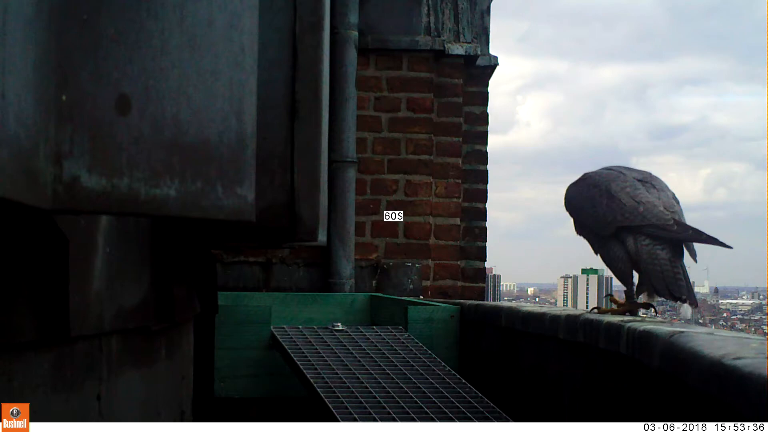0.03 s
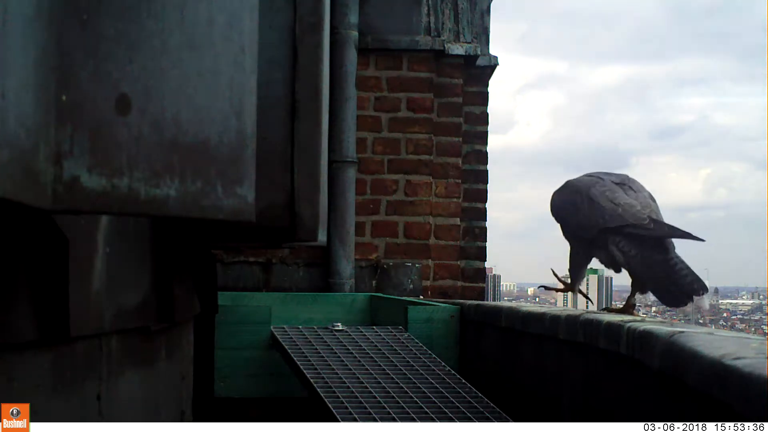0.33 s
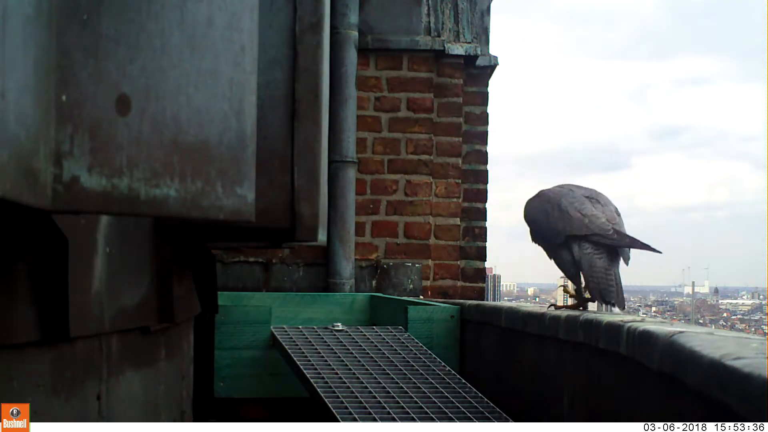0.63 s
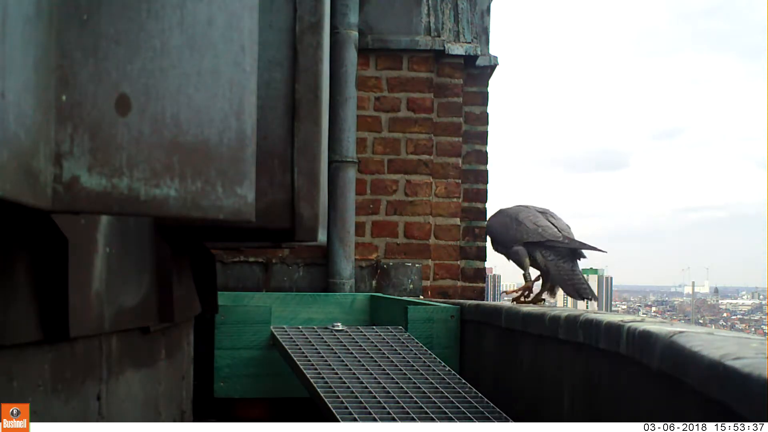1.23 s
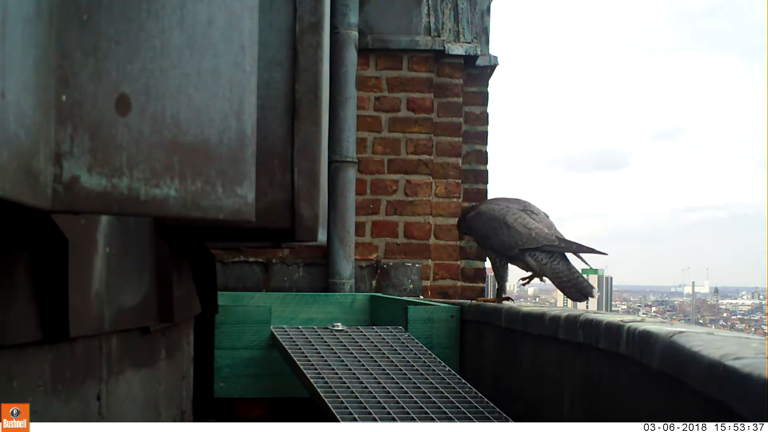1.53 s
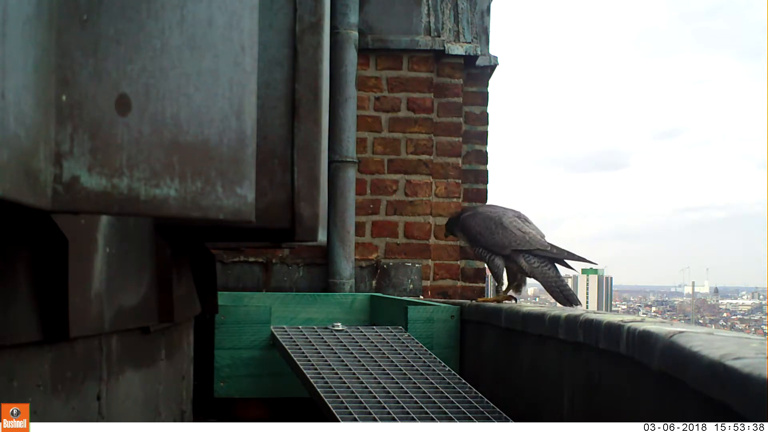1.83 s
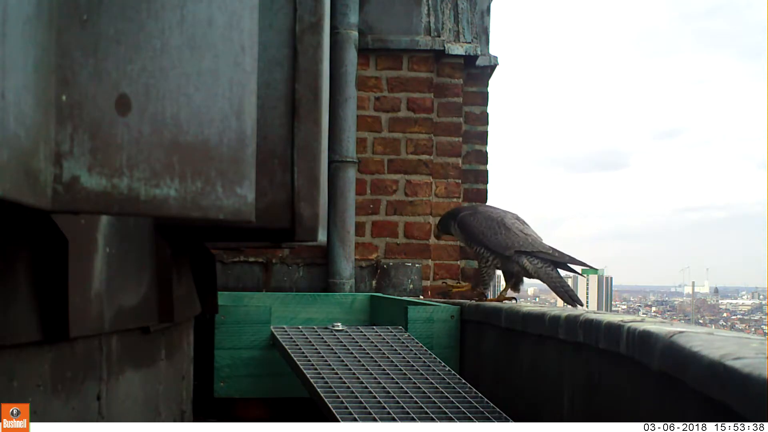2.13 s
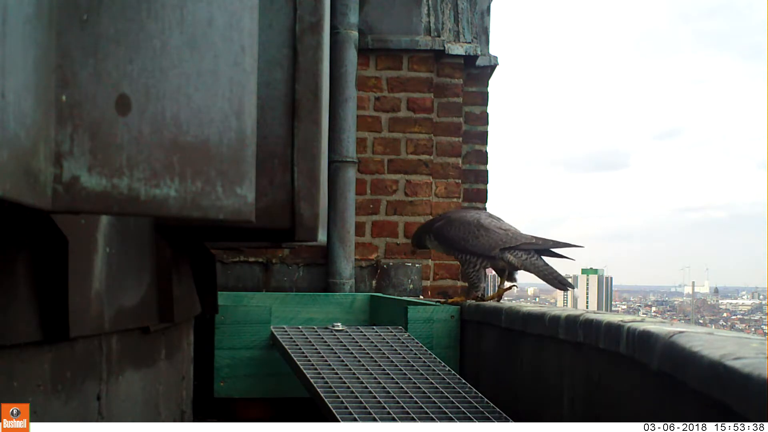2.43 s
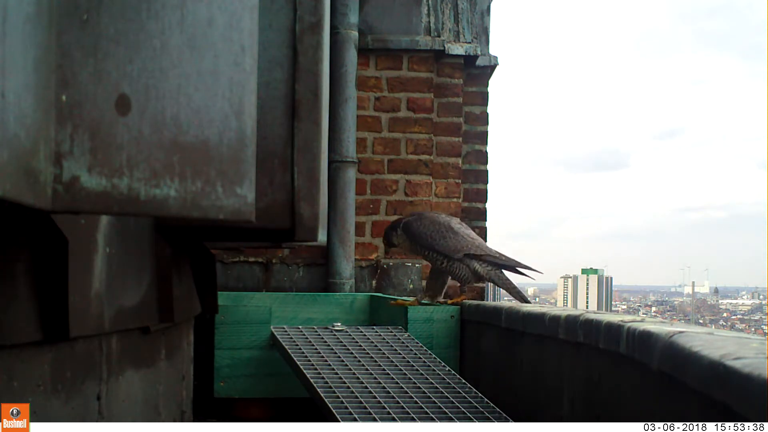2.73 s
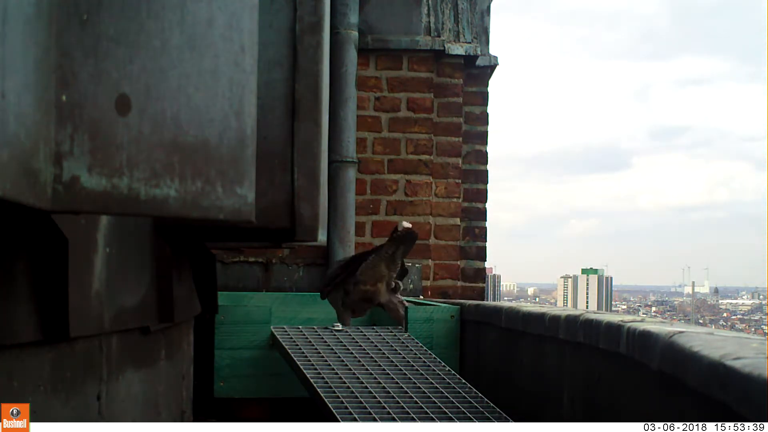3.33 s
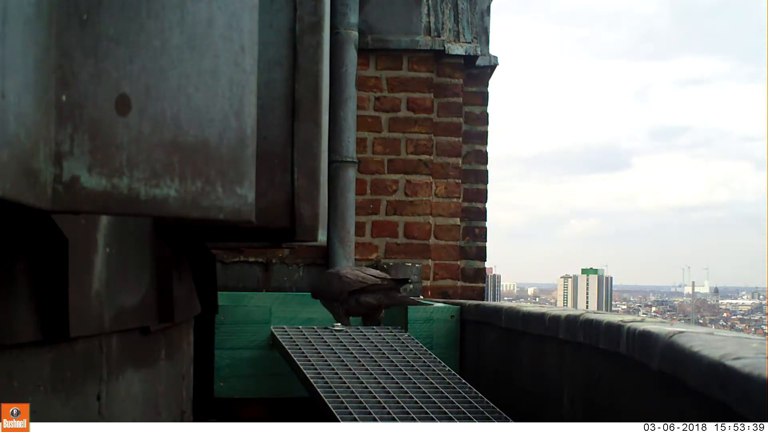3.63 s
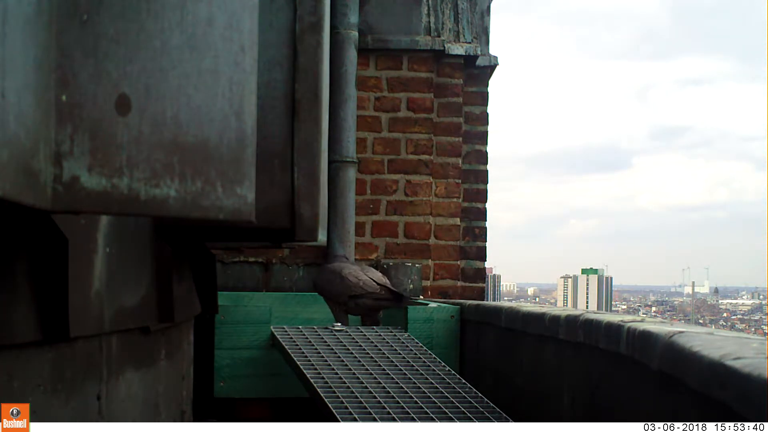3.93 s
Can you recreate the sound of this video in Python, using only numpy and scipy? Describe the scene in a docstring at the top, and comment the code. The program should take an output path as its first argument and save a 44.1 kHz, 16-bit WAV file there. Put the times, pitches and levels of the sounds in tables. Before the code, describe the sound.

A bird's claws tap and scrape along stone, then feathers rustle, over low wind.

```python
"""On a high stone ledge, a falcon walks along and drops into a nest box close by.
Its claws tap and scrape, ringing briefly between the walls, and its heavier steps thud.
Then its feathers brush the box. Two tiny snaps are heard; wind and city rumble lie under it all.
The sound comes on faintly and steps up to full level."""
import sys
import numpy as np
from scipy import signal
from scipy.fft import rfft, irfft
from scipy.io import wavfile
from scipy.ndimage import uniform_filter1d

SR = 44100
rng = np.random.default_rng(int(sys.argv[2]) if len(sys.argv) > 2 else 0)


def transcribe(u):
    """Save the signal u as a 16-bit wav file named by the first command-line argument.

    u: samples, shape (n,) or (channels, n), limited to [-1, 1]; the rate is SR.
    q: integer samples, one column per channel.
    """
    v = np.clip(np.atleast_2d(u).T, -1, 1)
    q = np.round(v * 32767).astype(np.int16)
    wavfile.write(sys.argv[1], SR, q)


N = 176400
T = np.arange(N) / SR

# claw taps: t/s, low knock/dB, middle ring/dB, high tick/dB, claw pitch/Hz
CLAW_TAPS = [(0.208, -47.5, -56, -69, 4300), (.792, -48.5, -56, -73, 3450), (0.826, -60.5, -86, -71, 2020),
             (.841, -74, -59.5, -63, 6750), (.866, -70, -59, -70, 4600), (1.008, -81, -70.5, -81, 4000),
             (1.078, -53, -52, -65, 3980), (1.268, -52.5, -54.5, -73, 4470), (1.276, -54, -62, -84, 2900),
             (1.342, -76, -67.5, -72, 4560), (1.575, -83, -69.5, -82, 4400),
             (1.596, -72, -59.5, -71.5, 4400), (1.689, -75, -62, -71.5, 4440),
             (1.819, -63.5, -56.5, -68.5, 4550), (1.929, -70, -65, -69.5, 4260),
             (1.965, -69, -62, -78, 4400), (2.049, -77, -62.5, -73, 4600), (2.055, -80, -70, -84, 5100),
             (2.119, -69, -64.5, -74.5, 4560), (2.289, -86, -67.5, -80, 4560), (2.297, -86, -76, -87, 5030),
             (2.406, -89, -72.5, -85, 4260), (2.433, -89, -75.5, -86, 4500), (2.511, -83, -74.5, -90, 4400),
             (2.618, -87, -71, -80, 4500), (2.798, -82, -78, -81, 5200), (2.888, -71, -67, -74.5, 4360),
             (2.955, -69.5, -71.5, -81, 4550), (2.981, -72, -64, -77, 4230)]
# claw scrapes: hardest push t/s, swell/s, fade/s, knock/dB, ring/dB, tick/dB, claw pitch/Hz
CLAW_SCRAPES = [(.26, 0.021, 0.07, -64.5, -65, -68, 4450), (.325, .0095, 0.0087, -57.5, -48.5, -60, 4100),
                (.547, 0.013, 0.023, -56, -48, -53, 4720), (.596, 0.01, 0.0092, -57.5, -50, -58.5, 4600),
                (.915, 0.016, 0.0074, -59.5, -49.5, -60.5, 4860),
                (1.113, 0.023, 0.007, -63.5, -50, -56.5, 4720), (1.413, 0.014, 0.035, -78, -67, -70, 4450),
                (1.451, .017, 0.0095, -58.5, -50, -62, 4450), (1.464, .01, 0.005, -56.5, -60, -69.5, 3800),
                (1.618, 0.015, 0.014, -64.5, -63.5, -75, 4530),
                (1.868, 0.025, 0.0076, -70, -66.5, -74.5, 5500), (2.094, .03, 0.025, -80, -68, -79, 4400),
                (2.342, .014, 0.015, -72, -69.5, -91, 4300), (2.671, 0.02, 0.0056, -72, -66.5, -75, 4500),
                (2.879, 0.011, 0.011, -63, -67, -77, 4300)]
def claws(size=16384, slips_per_s=2400, spread_db=3.5):
    """Claws catch and slip on stone. A tap is a click with a short skid; a scrape is a run of slips."""
    out, lead = np.zeros(N), size // 4
    t = (np.arange(size) - lead) / SR
    for when, *touch in CLAW_TAPS:
        force = slips(slips_per_s, spread_db, size) * push(t, swell_s=0.0049, fade_s=0.0087)
        force[lead] += 0.55 * np.linalg.norm(force)  # the click as the claw lands
        add(out, when + t[0], claw_contact(force, *touch))
    for when, swell, fade, *touch in CLAW_SCRAPES:
        force = slips(slips_per_s, spread_db, size) * push(t, swell, fade)
        add(out, when + t[0], claw_contact(force, *touch))
    return out


# tone of claw on stone: f/Hz, level/dB
CLAW_TONE = [(150, 0), (400, -15.5), (800, -8.5), (1300, -9.5), (2100, 2), (2900, -3.5), (4000, 2),
             (4800, 0), (5800, -8), (7500, -16), (10000, -19.5), (13500, -18.5)]
def claw_contact(force, knock_db, ring_db, tick_db, claw_hz):
    """A touch shakes claw and ledge, with its own pitch and its own mix of knock, ring and tick."""
    size = len(force)
    hz = np.fft.rfftfreq(size, 1 / SR)
    on_stone = colour(signal.fftconvolve(force, ledge())[:size], CLAW_TONE)
    spectrum = rfft(on_stone) * (1 + amp(1) * resonance(hz, claw_hz, width_hz=300))
    knock, below_tick = (1 / (1 + (hz / top_hz) ** 20) for top_hz in (3070, 5930))
    ring = (below_tick - knock) / np.hypot(1, (hz - 5460) / 2400)  # favours its upper end
    bands = [(knock, knock_db), (ring, ring_db), (1 - below_tick, tick_db)]
    sound = sum(amp(db) * unit(irfft(spectrum * band)) for band, db in bands)
    return sound * np.sqrt(0.02 * SR / size)  # levels count the energy as if spread over 0.02 s


# echo between the walls: f/Hz, time to fade by 60 dB/s
WALL_ECHO = [(300, 0.84), (2000, 0.13), (4500, 0.12), (8000, 0.075), (13000, 0.06)]
# notes that every touch sets ringing: f/Hz, width/Hz, level over the plain click/dB
LEDGE_RINGS = [(1307, 37, 5), (1610, 28, 1.5), (2153, 19, 4.5), (2250, 35, 3.5), (2530, 30, 6),
               (3430, 180, 0.5), (3800, 33, 8.5), (3950, 42, 3.5), (4190, 40, 3.5), (4410, 30, 7),
               (4495, 35, 7.5), (4720, 34, 4.5), (5000, 76, 0), (5410, 38, 6.5)]
def ledge(size=8192, echo_db=10):
    """How the ledge answers one click: the click itself, a short echo and some ringing notes."""
    t = np.arange(size) / SR
    hz, times, noise = signal.stft(rng.standard_normal(size), SR, nperseg=128)
    fade = amp(-60 * times / read(WALL_ECHO, hz)[:, None])
    tail = signal.istft(noise * fade, SR)[1][:size]
    echo = amp(echo_db) * tail / np.linalg.norm(tail)
    echo[0] += 1  # the click that arrives directly
    answer = echo / np.linalg.norm(echo)
    for f, width, db in LEDGE_RINGS:
        strength = amp(db) * 2 * np.pi * width / SR
        answer += strength * np.exp(-np.pi * width * t) * np.cos(2 * np.pi * (f * t + rng.random()))
    return answer


# heavy steps: t/s, dull thud/dB, hollow knock/dB
HEAVY_STEPS = [(.834, -57.5, -62), (0.907, -57.5, -72), (1.088, -49.5, -69), (1.268, -70, -52),
               (1.445, -60, -78)]
# the rings of one step: f/Hz, width/Hz, level/dB
THUD, KNOCK = [(369, 110, -1.5), (920, 200, -12)], [(770, 120, 0), (1300, 170, 1)]
def feet(size=8192, rise_s=0.0063, fade_s=0.11):
    """The bird's weight lands on a foot, making a soft thud and a hollow knock."""
    out, t, hz = np.zeros(N), np.arange(size) / SR, np.fft.rfftfreq(size, 1 / SR)
    loudness = np.minimum(t / rise_s, 1) * amp(-60 * t / fade_s)
    for when, *levels in HEAVY_STEPS:
        for rings, db in zip((THUD, KNOCK), levels):
            tone = sum(amp(level) * abs(resonance(hz, f, width)) ** 2 for f, width, level in rings)
            add(out, when, amp(db) * loudness * shaped_noise(tone, size))
    return out


# feather strokes: hardest push t/s, swell/s, fade/s, level/dB
FEATHER_STROKES = [(2.86, 0.082, 0.033, -78), (3.005, 0.049, 0.022, -69.5), (3.058, 0.034, 0.043, -59.5),
                   (3.165, .04, 0.058, -64), (3.235, .03, 0.079, -71.5), (3.61, 0.021, 0.078, -70.5),
                   (3.77, 0.089, 0.21, -74.5)]
# tone of feathers on wood: f/Hz, level/dB
FEATHER_TONE = [(500, 4), (2000, -4.5), (3300, -9.5), (4400, -2), (5800, -7.5), (7500, -8), (10000, -8),
                (13000, -1), (14000, -3.5)]
# notes of the box: f/Hz, width/Hz, level over the plain rustle/dB
BOX_NOTES = [(4200, 81, 0), (4490, 90, 4)]
def feathers():
    """Wings and tail brush the box: a fine, bright rustle that makes the wood ring faintly."""
    power = sum((amp(db) * push(T - when, swell, fade)) ** 2
                for when, swell, fade, db in FEATHER_STROKES)
    hz = np.fft.rfftfreq(N, 1 / SR)
    box = 1 + sum(amp(db) * resonance(hz, f, width) for f, width, db in BOX_NOTES)
    rustle = colour(slips(per_s=9000, spread_db=1.5, size=N), FEATHER_TONE)
    return np.sqrt(power) * unit(irfft(rfft(rustle) * box, N))


# tiny dry snaps: t/s, level/dB
DRY_SNAPS = [(1.927, -59), (3.75, -60.5)]
def snaps(size=1024, centre_hz=13000, width_octaves=0.56, fade_s=0.0021):
    """Very short bursts of high hiss, heard as bright ticks."""
    out, t, hz = np.zeros(N), np.arange(size) / SR, np.fft.rfftfreq(size, 1 / SR)
    tone = np.exp(-(np.log2((hz + 1) / centre_hz) / width_octaves) ** 2)
    for when, db in DRY_SNAPS:
        add(out, when, amp(db) * shaped_noise(tone, size) * np.exp(-(t / fade_s) ** 2))
    return out


# tone of the wind: f/Hz, level/dB
WIND_TONE = [(8, -10), (18, -2), (27, -3.5), (36, 4.5), (47, 0.5), (57, 3), (68, -0.5), (80, -9.5),
             (110, -13), (160, -21.5), (300, -43.5), (800, -61)]
# how the wind rises and falls: t/s, level/dB
WIND_GUSTS = [(.1, -45), (.5, -46.5), (.8, -50), (1.05, -45.5), (1.5, -47.5), (1.8, -49), (2.3, -47.5),
              (2.7, -48), (3.1, -49), (3.6, -48), (4, -53)]
def wind(drone_hz=64.33, drone_width_hz=2.7, drone_db=-56.5):
    """Wind makes an uneven low rumble with a deep, wavering hum."""
    gusts = amp(np.interp(T, *np.transpose(WIND_GUSTS)))
    rumble = unit(colour(rng.standard_normal(N), WIND_TONE))
    hz = np.fft.rfftfreq(N, 1 / SR)
    drone = shaped_noise(1 / (1 + ((hz - drone_hz) / drone_width_hz) ** 2), N)
    return gusts * rumble + amp(drone_db) * drone


# tone of the far city and its steady hiss: f/Hz, level/dB
CITY_TONE = [(60, -3), (130, -3), (200, -1), (285, -1), (380, -9), (480, -10), (620, -15), (900, -11),
             (1150, -15), (1500, -20.5), (2100, -24.5), (3000, -32), (3700, -30.5), (4400, -31.5),
             (5300, -37.5), (7000, -40), (10000, -39.5), (14000, -44.5)]
def city(level_db=-59, drift_db=1.5):
    """Far traffic blurs into a wash of noise whose low and high parts drift a little in level."""
    noise = signal.stft(rng.standard_normal(N), nperseg=2048)[2]
    drift = uniform_filter1d(rng.standard_normal(noise.shape), size=5, axis=0)  # smooth over pitch
    drift = unit(uniform_filter1d(drift, size=6, axis=1))  # and over time
    wash = signal.istft(noise * amp(drift_db * drift))[1][:N]
    return amp(level_db) * unit(colour(wash, CITY_TONE))


def push(t, swell_s, fade_s):
    """Pressure that swells up to t = 0 and fades after it."""
    return np.exp(-np.abs(t / np.where(t < 0, swell_s, fade_s)) ** 1.47)


def slips(per_s, spread_db, size):
    """Rubbing surfaces make tiny slips of uneven strength at random moments."""
    strength = amp(spread_db * np.minimum(rng.exponential(1, size), 4))
    direction = rng.choice([-1., 1.], size)
    slipping = rng.random(size) < per_s / SR
    return unit(direction * strength * slipping)


def resonance(hz, centre_hz, width_hz):
    """How a ringing thing answers each frequency: most strongly at its own note."""
    return 1 / (1 + 2j * (hz - centre_hz) / width_hz)


def shaped_noise(tone, size):
    """Noise with each frequency turned up or down by tone."""
    return unit(irfft(rfft(rng.standard_normal(size)) * tone, size))


def colour(x, points):
    """Gives a sound the tone in a table of f/Hz, level/dB."""
    hz = np.fft.rfftfreq(len(x), 1 / SR)
    return irfft(rfft(x) * amp(read(points, hz)), len(x))


def read(points, hz):
    """Reads between a table's rows, with frequency spaced in octaves."""
    f, value = np.transpose(points)
    return np.interp(np.log(hz + 1), np.log(f + 1), value)


def amp(db):
    """Turns decibels into a multiplier."""
    return 10 ** (np.asarray(db) / 20)


def unit(x):
    """Scales a signal to an average strength (rms) of 1."""
    return x / np.sqrt(np.mean(x ** 2) + 1e-30)


def add(mix, start_s, sound):
    """Mixes a sound in at the given time."""
    at = round(start_s * SR)
    part = mix[max(at, 0):max(at + len(sound), 0)]
    part += sound[max(-at, 0):][:len(part)]


def scene():
    """Wind, city and bird, heard together in one channel."""
    return (wind() + city() + feathers() + claws() + feet() + snaps())[None]


def record(dry, on_s=0.108, faint_db=-23.5, step_s=0.827, rise_s=0.0028, top_hz=13950):
    """The sound comes on faintly, then steps up to full level; the highest treble is cut off."""
    gain = (T > on_s) * np.interp(T, [step_s, step_s + rise_s], [amp(faint_db), 1])
    lowpass = signal.firwin(511, top_hz, window=("kaiser", 9), fs=SR)
    return signal.oaconvolve(dry * gain, lowpass[None], "same")


dry = scene()
out = record(dry)
transcribe(out)
```